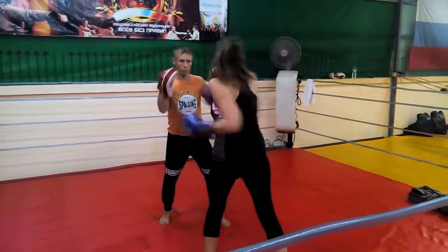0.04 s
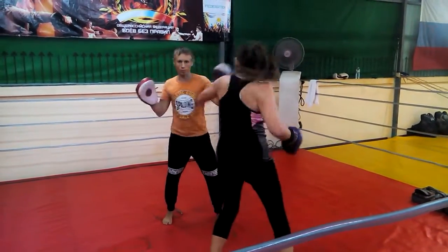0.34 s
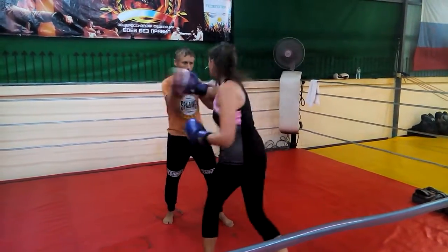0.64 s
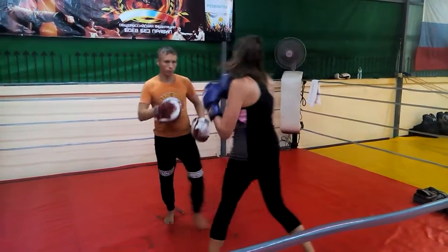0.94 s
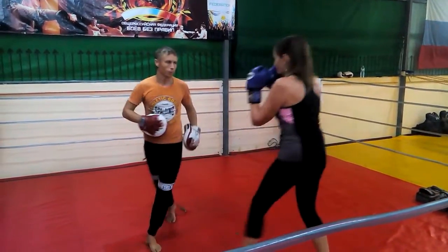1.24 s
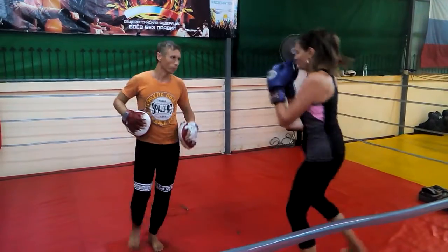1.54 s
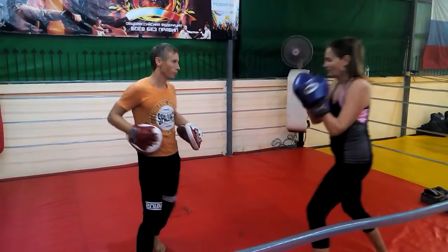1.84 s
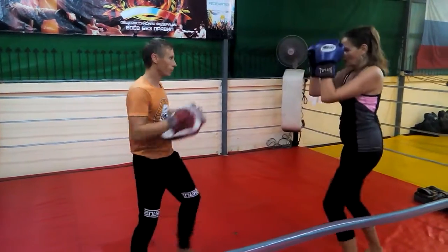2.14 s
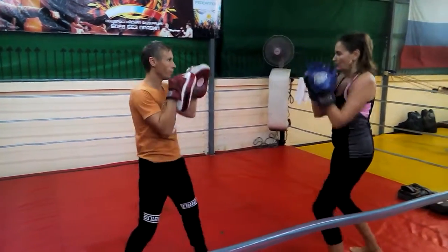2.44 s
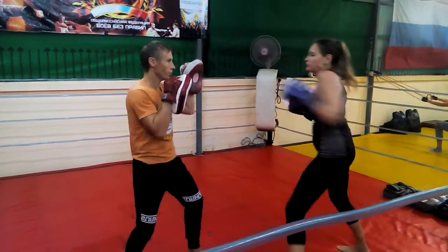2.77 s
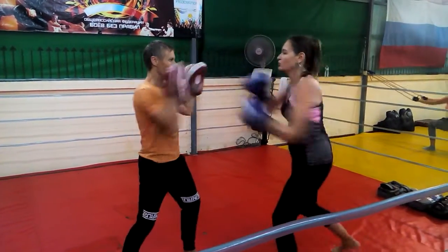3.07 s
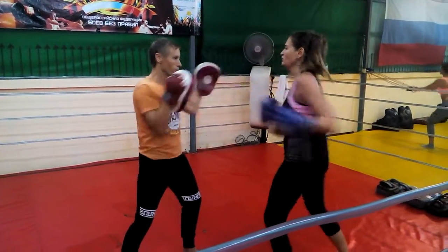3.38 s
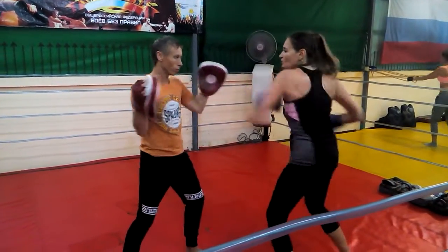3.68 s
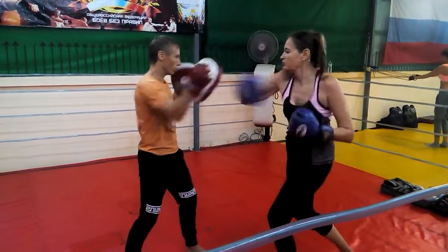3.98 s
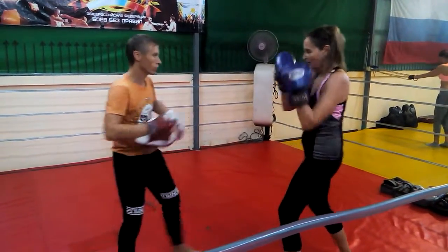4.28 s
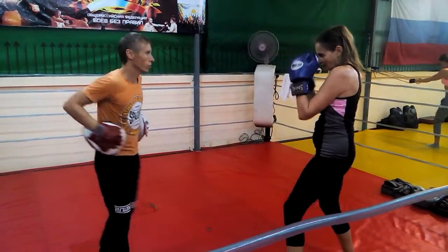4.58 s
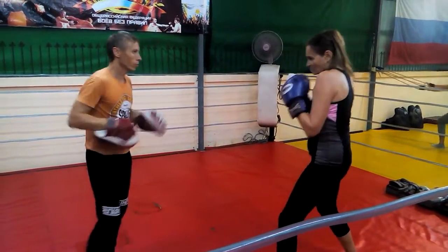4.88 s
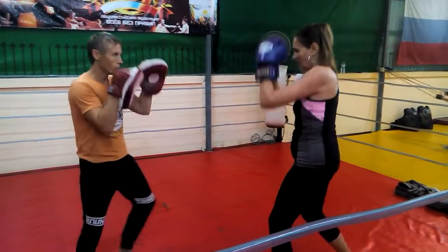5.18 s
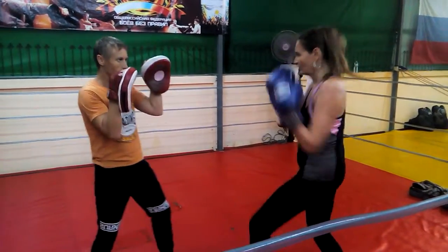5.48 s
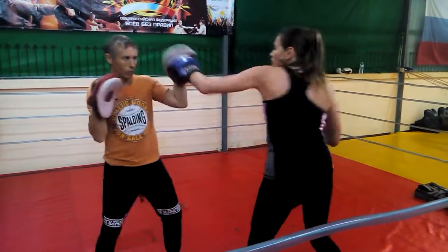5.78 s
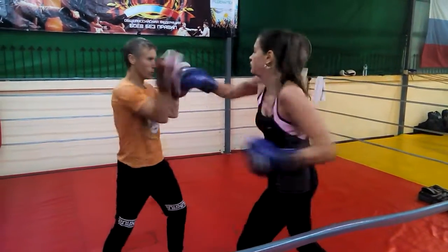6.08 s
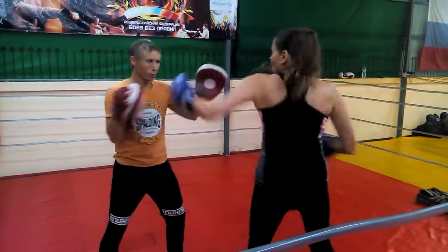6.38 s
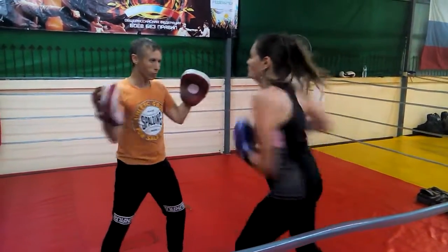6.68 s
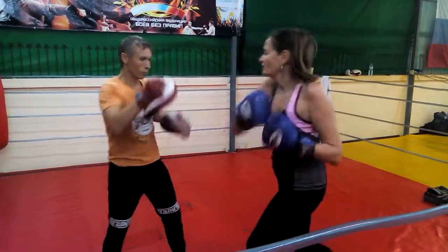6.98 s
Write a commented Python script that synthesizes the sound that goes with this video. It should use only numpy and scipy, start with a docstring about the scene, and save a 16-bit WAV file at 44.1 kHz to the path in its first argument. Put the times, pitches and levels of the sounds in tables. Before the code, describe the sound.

Three runs of sharp, thumping punches on leather mitts ring briefly through a gym over quiet ventilation and soft foot shuffles.

```python
"""A padded gym, one microphone a few metres from boxing gloves smacking focus mitts in three quick
combinations. Each punch thumps the foam, pops the trapped air and cracks the leather; floor, walls
and hall answer. Between sets, bare feet and gear shuffle over quiet ventilation, and a few faint,
thin whistles are heard. The recorder turns down quiet sound and clips peaks."""
import sys
import numpy as np
from scipy import signal
from scipy.fft import rfft, irfft, next_fast_len
from scipy.io import wavfile
from scipy.ndimage import uniform_filter1d

SR = 44100
rng = np.random.default_rng(int(sys.argv[2]) if len(sys.argv) > 2 else 0)


def generate_wav(signal):
    """Clip the signal to [-1, 1] and save it as 16-bit WAV at the path in sys.argv[1]."""
    frames = np.transpose(np.atleast_2d(signal))
    scaled = np.clip(frames, -1, 1) * 32767
    pcm = np.round(scaled).astype(np.int16)
    wavfile.write(sys.argv[1], SR, pcm)


N = 313992
SIZE = 4096  # samples in one short sound
HZ, T = np.fft.rfftfreq(SIZE, 1 / SR), np.arange(SIZE) / SR

# The blows. Each row: start in seconds, force in dB, sink into the foam in dB, flat slap of leather
# in dB, thump pitch in Hz, share thrown into the hall in dB.
PUNCHES = [ (0.022, -25, .5, 1, 234, -2.3), (0.4059, -15.5, -5, -2, 265, -2.4),
           (0.7803, -21.5, -1.5, 6.5, 261, 1.5), (3.0471, -20.5, -2, 3.5, 242, -.5),
           (3.3207, -20.5, 0, -.5, 226, -3.5), (3.705, -18.4, -2, -1.2, 304, -1.3),
           (4.0677, -16.5, 0.9, 6.5, 290, 0), (5.9357, -21.5, -7.5, 0, 240, 3),
           (6.2164, -21.5, 0.5, -1.4, 197.4, -3.5), (6.6076, -17.5, -3.5, 7, 216, -3.5),
           (6.985, -15.3, 1.2, .8, 203, -2)]


def amp(db):
    """Decibels to gain."""
    return 10 ** (np.asarray(db) / 20)


def unit(x):
    """Scale to rms 1."""
    return x / np.sqrt(np.mean(x ** 2) + 1e-20)


def burst(spectrum, db):
    """Give a short sound's spectrum the energy of 10 ms at this level."""
    return spectrum * amp(db) * np.sqrt(.01 * SR / np.mean(abs(spectrum) ** 2))


def along(points, hz):
    """Read a curve of (Hz, value) points on a log frequency axis."""
    f, values = np.transpose(points)
    return np.interp(np.log(hz + 1), np.log(f + 1), values)


def filtered(x, response):
    """Filter x by a gain that is a function of frequency."""
    size = next_fast_len(len(x) + 2 * SIZE)
    return irfft(rfft(x, size) * response(np.fft.rfftfreq(size, 1 / SR)), size)[:len(x)]


def noise(spectrum):
    """Steady coloured noise of rms 1."""
    return unit(filtered(rng.standard_normal(N), lambda f: amp(along(spectrum, f))))


def wander(samples):
    """Random drift of rms 1, smoothed over this many samples."""
    return unit(uniform_filter1d(rng.standard_normal(N), size=samples))


def causal(db):
    """Minimum-phase response with these gains."""
    cepstrum = irfft(db * np.log(10) / 20)
    half = len(cepstrum) // 2
    cepstrum[1:half] *= 2
    cepstrum[half + 1:] = 0
    return np.exp(rfft(cepstrum))


def even(spectrum):
    """Flatten a spectrum's broad shape: only the fine ripple stays."""
    power = abs(uniform_filter1d(abs(spectrum) ** 2, size=70))
    return spectrum * causal(-10 * np.log10(power + 1e-12))


def resonance(hz, width_hz):
    """Response of one damped mode."""
    return 1j * HZ * width_hz / (hz ** 2 - HZ ** 2 + 1j * HZ * width_hz)


def delay(seconds):
    """Response of a late arrival."""
    return np.exp(-2j * np.pi * HZ * seconds)


def swell(peak_s, width_s):
    """Bell-shaped rise and fall in level."""
    return np.exp(-.5 * ((np.arange(N) / SR - peak_s) / width_s) ** 2)


def add(track, start_s, x):
    """Mix x into the track."""
    part = track[max(round(start_s * SR), 0):][:len(x)]
    part += x[:len(part)]


def ventilation(rest_db=-62, lift_db=6.5, settle_s=1.5, hum_db=-12, waver=.016):
    """Air rushes and fans drone unsteadily; the level steps up at each punch, then settles."""
    # Rushing air. Each row: frequency in Hz, relative level in dB.
    air = [(25, -14), (45, -19.5), (90, -11), (200, -5), (330, -6), (480, -8.5), (900, -2), (1150, -4),
           (1400, -1.5), (1900, -6.5), (2700, -9.5), (4200, -9), (6000, -11.5), (7800, -41.5)]
    # Fan tones. Each row: pitch in Hz, relative level in dB.
    hum = [(126, -10.5), (170, -2.5), (248, 0.5)]
    t = np.arange(N) / SR
    lift = np.max([(t > start) * np.exp(-abs(t - start) / settle_s) for start, *_ in PUNCHES], axis=0)
    drone = sum(amp(db) * np.sin(2 * np.pi * hz * np.cumsum(1 + waver * wander(3000)) / SR)
                for hz, db in hum)
    return amp(rest_db + lift_db * lift) * (noise(air) + amp(hum_db) * unit(drone))


def hiss(level_db=-70):
    """A thin, steady hiss near 7 kHz."""
    # The hiss band. Each row: frequency in Hz, relative level in dB.
    band = [(5800, -36), (6400, -10.5), (6800, -4.5), (7300, -1), (7900, -6), (8400, -10), (8900, -36.5)]
    return amp(level_db) * noise(band)


def crack(hz, t60, focus_db=4, octaves=.4, rise_s=.00026):
    """Spectrum of leather meeting leather, lifted around hz: tiny slaps spread over the curved glove."""
    # Tone of struck leather. Each row: frequency in Hz, relative level in dB.
    leather = [(100, -19.5), (500, 1.5), (1200, -8.5), (2300, -1), (2900, -6), (4500, -2), (6300, -6.5),
               (7400, -5.5), (8000, -12.5), (8800, -27.5)]
    focus = focus_db * np.exp(-.5 * (np.log2((HZ + 1) / hz) / octaves) ** 2)
    slaps = rng.standard_normal(SIZE) * amp(-60 * T / t60) * (1 - np.exp(-T / rise_s))
    return causal(along(leather, HZ) + focus), even(rfft(slaps))  # smooth tone, fine ripple


def touches():
    """Light contacts make the leather tick."""
    # Each row: start in seconds, level in dB.
    contacts = [(0.0179, -36.5), (5.326, -52.5), (6.6032, -30.5)]
    out = np.zeros(N)
    for start, db in contacts:
        tone, slaps = crack(5000, t60=.018)
        add(out, start, irfft(burst(tone * slaps, db)))
    return out


def thump(hz, width_hz=150, soft_hz=520):
    """The foam is squashed and rebounds within a cycle or two; its softness rounds the pulse."""
    return -resonance(hz, width_hz) * resonance(hz, soft_hz)


def pop(hz, width_hz):
    """A pocket of air between glove and mitt rings for a few cycles."""
    return -resonance(hz, width_hz) * resonance(hz, 2.1 * width_hz)


def nearby(floor_s=.0046, floor_gain=.29, scatter=.17, body_hz=700):
    """Paths to the microphone: direct, off the mat, and off bodies, which bass bends around."""
    bounce = floor_gain * delay(floor_s * rng.uniform(.9, 1.1))
    bodies = sum(rng.choice([-1, 1]) * delay(s) for s in rng.uniform(.00086, .013, size=10))
    paths = irfft(1 + bounce + scatter * bodies * 1j * HZ / (body_hz + 1j * HZ))
    return paths / np.linalg.norm(paths)


def hall(onset_s=.0027, build_s=.003, sparse_s=.022, spiky=.89):
    """Separate wall echoes thicken into a tail; each frequency dies at its own speed."""
    # The gym's decay. Each row: frequency in Hz, seconds to fall 60 dB.
    decay = [(60, .4), (140, 0.37), (280, 0.31), (700, 0.43), (1150, .49), (1450, 0.47), (2400, 0.48),
             (5000, 0.46), (8000, 0.56)]
    # The gym's colour. Each row: frequency in Hz, gain in dB.
    colour = [(30, -8), (50, -2.5), (67, 3), (95, -4), (130, 5.5), (220, -3.5), (450, -5), (660, -1),
              (900, 0), (1130, 3), (1450, 0.5), (2900, 0), (5000, -0.5), (8000, 1.5)]
    t = np.arange(8 * SIZE) / SR
    spread = spiky * np.exp(-t / sparse_s)
    sizes = np.repeat(rng.standard_normal(len(t)), 16)[:len(t)]
    echoes = rng.standard_normal(len(t)) * np.exp(spread * sizes - spread ** 2)
    hz, age, bands = signal.stft(echoes, SR, nperseg=512)
    tail = signal.istft(bands * amp(-60 * age / along(decay, hz)[:, None]), SR, nperseg=512)[1][:len(t)]
    build = 1 - np.exp(-np.maximum(t - onset_s, 0) / build_s)
    tail = irfft(even(rfft(tail * build)))
    return signal.fftconvolve(tail / np.linalg.norm(tail), irfft(causal(along(colour, HZ))))


def punches(thump_db=1, palm_db=-5, air_db=-1, push_db=-12.5, shell_db=-3, wet_db=1, usual_force_db=-19):
    """Foam, air pockets and leather sound together, and the gym answers each blow."""
    # Ring of the gloves and mitt shells. Each row: pitch in Hz, width in Hz, relative level in dB.
    modes = [(363, 20, -8.5), (695, 170, -9.5), (950, 90, -9), (1480, 130, -3.5), (1950, 250, -12),
             (3170, 370, -4), (5150, 540, -10.5)]
    shell = 1 + amp(shell_db) * sum(amp(db) * resonance(hz, width) for hz, width, db in modes)
    out = np.zeros(N)
    for start, force_db, sink_db, slap_db, foam_hz, hall_db in PUNCHES:
        # the palm's hollow and the trapped air drop in pitch as the glove sinks in
        palm_hz = 790 * 2 ** (-.033 * sink_db)
        air_hz = 1510 * 2 ** (-.023 * sink_db)
        # a flatter slap raises the crack; more force spreads the contact and lowers it
        crack_hz = 4380 * 2 ** (.025 * slap_db - .04 * (force_db - usual_force_db))
        push = burst(-resonance(82, 120), force_db + push_db + .42 * sink_db)  # the mitt shoves the air
        foam = burst(thump(foam_hz), force_db + sink_db + thump_db)
        palm = burst(pop(palm_hz, width_hz=210), force_db + palm_db)
        air = burst(pop(air_hz, width_hz=620) * delay(.0012), force_db + air_db)
        tone, slaps = crack(crack_hz, t60=.022)
        leather = burst(tone, force_db + slap_db)
        blow = irfft(shell * (push + foam + palm + air + leather * slaps))
        add(out, start, signal.fftconvolve(blow, nearby()))
        # the hall gathers sound thrown in all directions, so there the parts add as powers
        power = sum(abs(shell * part) ** 2 for part in (push, foam, palm, air, leather))
        thrown = irfft(causal(10 * np.log10(power + 1e-9)))
        add(out, start, amp(hall_db + wet_db) * signal.fftconvolve(thrown, hall()))
    return out


def shuffles(gain_db=5, rough_db=3):
    """Bare feet brush the mat and gear rubs in short, grainy strokes."""
    # Each row: peak time in seconds, width in seconds, relative level in dB.
    strokes = [(1.374, .034, -61), (1.547, 0.015, -62.5), (1.607, 0.047, -66), (2.286, .04, -67.5),
               (2.729, 0.032, -67), (4.691, 0.018, -66), (5.262, .01, -67), (5.544, .038, -67)]
    # Tone of the brushing. Each row: frequency in Hz, relative level in dB.
    brush = [(60, -24), (250, -8), (700, 0.5), (1400, 0.5), (2600, -3), (4000, -2.5), (6000, -3), (7300, 4),
             (8200, -10), (8900, -25)]
    level = sum(amp(db + gain_db) * swell(peak, width) for peak, width, db in strokes)
    grain = amp(rough_db * wander(150))
    return level * unit(grain * noise(brush))


def whistles(gain_db=5, waver=.028):
    """Brief, faint, thin whistles with wavering pitch amid the shuffling."""
    # Each row: peak time in seconds, width in seconds, pitch in Hz, relative level in dB.
    tones = [(2.749, .02, 4250, -72.5), (5.336, .011, 5800, -67), (5.35, .015, 4025, -69),
             (5.546, .028, 4980, -66.5), (5.564, .012, 5750, -72)]
    uneven_time = np.cumsum(1 + waver * wander(90)) / SR
    return sum(amp(db + gain_db) * swell(peak, width) * np.sin(2 * np.pi * hz * uneven_time)
               for peak, width, hz, db in tones)


def scene(wet_db=-2):
    """Pad work in the gym, heard in mono from a few metres away."""
    blows = punches()
    small_sounds = shuffles() + whistles() + touches()
    echo = amp(wet_db) * signal.fftconvolve(small_sounds, hall())[:N]
    return (blows + small_sounds + echo + ventilation() + hiss())[None]


def suppress(x):
    """Noise suppression: bands that fall under the knee are turned down, which cuts the tails short."""
    # The knee. Each row: frequency in Hz, band level in dB below which the cut sets in.
    knee = [(100, -68.5), (1500, -64), (3000, -73.5), (8000, -72.5)]
    # The deepest cut. Each row: frequency in Hz, gain in dB.
    deepest = [(100, -7), (2000, -8), (2800, -15.5), (6000, -17), (6900, -3.5), (9000, -4)]
    hz, _, bands = signal.stft(x, SR, nperseg=512)
    power = uniform_filter1d(abs(bands) ** 2, size=5, axis=0)  # smooth across pitch
    power = uniform_filter1d(power, size=4, axis=1)  # and over time
    over_knee = power / amp(along(knee, hz)[:, None]) ** 2
    gain_db = along(deepest, hz)[:, None] / (1 + over_knee ** 2)
    return signal.istft(bands * amp(gain_db), nperseg=512)[1][:N]


def record(dry, top_hz=8750):
    """The recorder suppresses noise, overloads on the hardest blows and cuts the top treble steeply."""
    x = suppress(dry[0])
    x = x / (1 + x ** 8) ** (1 / 8)  # soft clip
    x = filtered(x, lambda f: 1 / np.sqrt(1 + (f / top_hz) ** 120))
    return np.clip(x, -1, 1)[None]


dry = scene()
out = record(dry)
generate_wav(out)
```